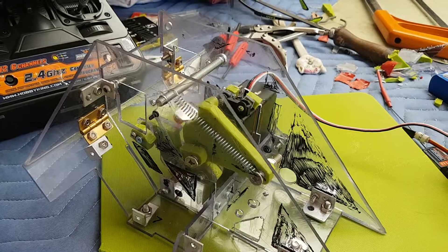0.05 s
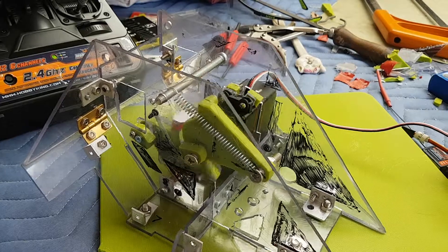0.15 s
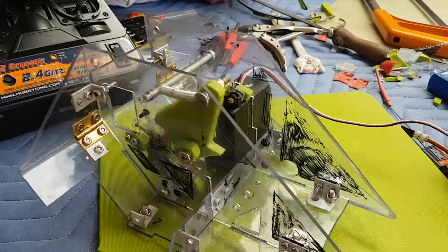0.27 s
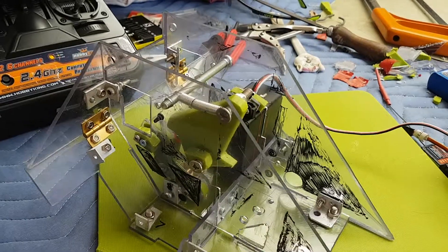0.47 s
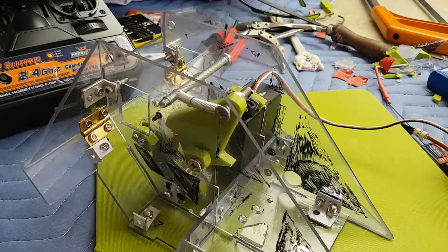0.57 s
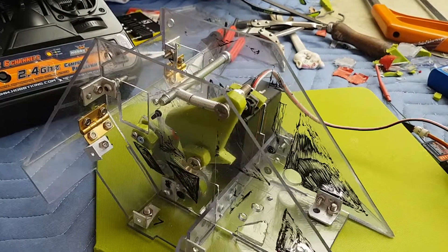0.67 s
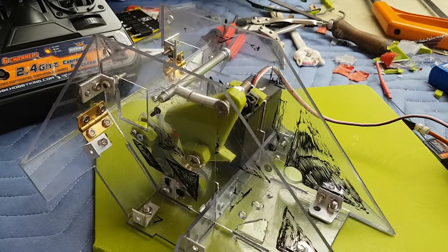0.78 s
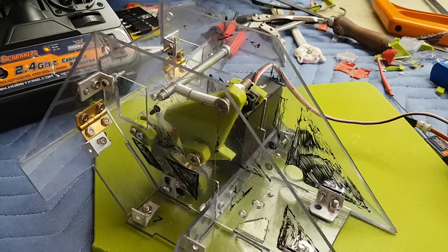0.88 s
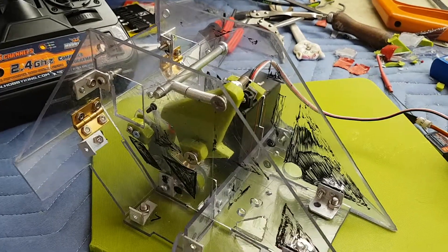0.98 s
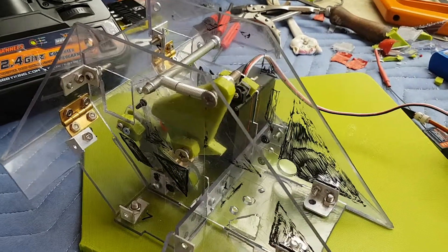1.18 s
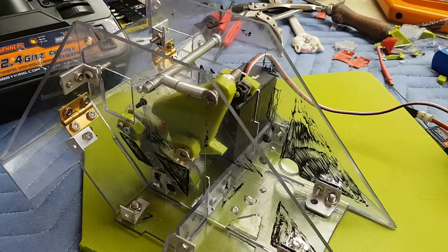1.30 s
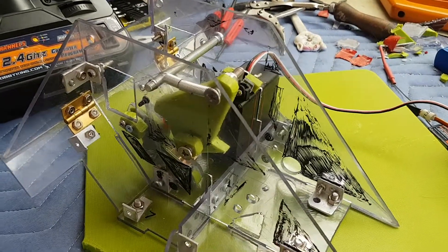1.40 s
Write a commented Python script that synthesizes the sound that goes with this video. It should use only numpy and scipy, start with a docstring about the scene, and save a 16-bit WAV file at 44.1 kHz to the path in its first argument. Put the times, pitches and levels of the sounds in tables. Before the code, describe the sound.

Sharp, loud snap of a plastic flipper after a short motor whine, then a light knock.

```python
"""A small geared motor winds the spring of a plastic flipper on a workbench, close to a stereo pair.
Its gears whine and grind, and the cam squeaks by stick and slip as it slides off. The arm snaps over in
a quick clatter that rings the plastic and overloads the microphones. The spring shivers, and the
mechanism knocks once more as it settles. A faint electric hum stays behind in the quiet room."""
import sys
import numpy as np
from scipy import signal
from scipy.fft import rfft, irfft
from scipy.io import wavfile

SR = 44100
rng = np.random.default_rng(int(sys.argv[2]) if len(sys.argv) > 2 else 0)


def file_out(sig):
    """Save sig as 16-bit WAV at sys.argv[1]."""
    # one column per channel
    cols = np.atleast_2d(sig).T
    # limit, then scale
    lim = np.clip(cols, -1, 1)
    pcm = np.round(lim * 32767).astype(np.int16)
    wavfile.write(sys.argv[1], SR, pcm)


N = 63945
T = np.arange(N) / SR
BIN_HZ = np.fft.rfftfreq(N, 1 / SR)


def amp(db):
    """Decibels to gain."""
    return 10 ** (np.asarray(db) / 20)


def unit(x):
    """Scales to rms 1."""
    return x / np.sqrt(np.mean(x ** 2) + 1e-20)


def read(points, hz):
    """Reads a table on a log-frequency axis."""
    f, value = np.transpose(points)
    return np.interp(np.log(hz + 1), np.log(f + 1), value)


def curve(rows):
    """Each column of a time table, at every sample."""
    times, *columns = np.transpose(rows)
    return [np.interp(T, times, column) for column in columns]


def pan(db):
    """Microphone gains that put the left one db above the right."""
    return amp(np.array([[.5], [-.5]]) * db)


def colour(x, spectrum):
    """Filters by a spectrum, to rms 1."""
    return unit(irfft(rfft(x) * amp(read(spectrum, BIN_HZ)), N))


def noise(shared):
    """White noise, with a share of its power common to both microphones."""
    shared = np.clip(shared, 0, 1)
    spectra = rfft(rng.standard_normal((3, N)))
    return irfft(np.sqrt(shared) * spectra[0] + np.sqrt(1 - shared) * spectra[1:], N)


def impulses(per_s):
    """Random clicks, separate at each microphone."""
    return rng.standard_normal((2, N)) * (rng.random((2, N)) < per_s / SR)


def wander(hz):
    """Random drift of rms 1, up to about this rate."""
    return unit(irfft(rfft(rng.standard_normal(N)) * np.exp(-(BIN_HZ / hz) ** 2), N))


def fall(start_s, decay_s):
    """Sudden start and exponential fall."""
    return (T >= start_s) * np.exp(-np.maximum(T - start_s, 0) / decay_s)


# How far the left microphone leads the right: frequency_hz, lead_rad
LEFT_LEAD = [(1500, 0.14), (1800, .6), (1950, 1.7), (2100, 1.9)]

def tone(phase, hz):
    """A sine of rms 1 as the two microphones hear it."""
    return np.sqrt(2) * np.sin(phase + np.array([[.5], [-.5]]) * read(LEFT_LEAD, hz))


# The motor's speed and effort, close up: time_s, pitch_hz, gain_db
MOTOR_RUN = [(0, 426, -3), (.02, 440, -0.5), (.06, 457.5, -1), (.076, 467.5, -2.5), (.092, 479.2, 0),
             (.135, 470.2, -1.5), (.16, 470.5, -2), (.178, 497, 3), (.205, 469.8, -1.5), (.226, 419.4, -9)]
# The whine's two lowest harmonics: time_s, first_db, second_db
WHINE_HARMONICS = [(0, -57, -47.5), (.025, -56.5, -45), (.06, -56.5, -38.5), (.073, -47.5, -55),
                   (.092, -42, -41.5), (.14, -50.5, -38.5), (.158, -43, -41), (.174, -53.5, -45.5),
                   (.183, -50, -58.5)]
# Gear mesh partials, mostly on the right: pitch_ratio, level_db, left_over_right_db
MESH_PARTIALS = [(2.98, -39.5, -5), (3.3, -40, -7), (3.93, -45.5, -4.5), (4.32, -43, -5.5),
                 (4.96, -52.5, 0)]
# Gear noise at the teeth: frequency_hz, relative_db
GEAR_SPECTRUM = [(30, -27), (100, -29.5), (250, -21), (450, -14), (700, -19.5), (1100, -10.5), (1400, -3),
                 (1900, -5.5), (2300, -13), (2800, -13.5), (6400, -16), (7800, -26), (11800, -27),
                 (13300, -35), (15500, -37)]
# Gear noise across the pair: frequency_hz, left_over_right_db
GEAR_PAN = [(500, -0.5), (1000, 2), (1500, -5.5), (2500, -1), (6000, -2.5), (7700, 5.5), (9700, -6),
            (11500, 3.5), (15000, 1)]
# Resonances of the housing: centre_hz, half_width_hz, lift_db
HOUSING_PEAKS = [(3210, 100, 5.5), (3980, 210, 9), (5010, 110, 11), (9900, 400, 10)]
MOTOR_STOP_S, MOTOR_COAST_S, SPEED_JITTER = .214, .014, .01
FLUTTER_DB, GEARS_DB, TEETH_PER_TURN, TOOTH_SPREAD_DB = 5, -34, 2, 7

def motor():
    """Wavering gear whine, with tooth clicks and grinding coloured by the housing."""
    hz, effort_db = curve(MOTOR_RUN)
    level = amp(effort_db) * np.exp(-np.maximum(T - MOTOR_STOP_S, 0) / MOTOR_COAST_S)
    turns = np.cumsum(hz * (1 + SPEED_JITTER * wander(hz=117))) / SR
    whine = sum(amp(db) * tone(2 * np.pi * k * turns, k * hz)
                for k, db in enumerate(curve(WHINE_HARMONICS), 1))
    for ratio, db, side_db in MESH_PARTIALS:
        gain = pan(side_db) * amp(db + FLUTTER_DB * wander(hz=35))
        whine += gain * tone(2 * np.pi * (ratio * turns + rng.random()), ratio * hz)
    contacts = np.diff(np.floor(turns * TEETH_PER_TURN), prepend=0)
    teeth = contacts * amp(TOOTH_SPREAD_DB * rng.standard_normal((2, N)))
    grind = .7 * noise(shared=.15)
    clicks = .5 * unit(teeth * rng.choice([-1, 1], (2, N)))
    gears = colour(grind + clicks, GEAR_SPECTRUM)
    housing_db = sum(lift / (1 + ((BIN_HZ - centre) / width) ** 2)
                     for centre, width, lift in HOUSING_PEAKS)
    housed = irfft(rfft(gears) * amp(housing_db) * pan(read(GEAR_PAN, BIN_HZ)), N)
    return level * (whine + amp(GEARS_DB) * housed)


# Room tone around the bench: frequency_hz, relative_db
AIR_SPECTRUM = [(25, -13), (60, -15.5), (100, -13.5), (140, -5), (250, -8.5), (400, -2.5), (650, -10.5),
                (1250, -13.5), (2100, -11.5), (2800, -19.5), (4300, -24), (10400, -33.5), (15500, -30.5)]
# The recorder's gain on that noise, below and above the split: time_s, low_gain_db, treble_gain_db
RECORDER_NOISE_GAIN = [(0, -66, -70.5), (.55, -70.5, -66.5), (.9, -70.5, -70), (1.08, -63.5, -66),
                       (1.25, -63, -66), (1.45, -60.5, -61)]
# Faint rustles in the room: centre_s, half_width_s, level_db
RUSTLE_SWELLS = [(.78, 0.028, -81), (1.159, 0.022, -73)]
# Their thin hiss: frequency_hz, relative_db
RUSTLE_SPECTRUM = [(2000, -23), (5000, -2), (7000, -2), (10000, -13), (15000, -22)]
AIR_WIDE_HZ, AIR_SPLIT_HZ = 805, 1800

def room_tone():
    """Steady room noise, held down by the recorder after the snap, comes back up; two faint rustles."""
    low_db, treble_db = curve(RECORDER_NOISE_GAIN)
    air = colour(noise(shared=.64 / (1 + (BIN_HZ / AIR_WIDE_HZ) ** 2)), AIR_SPECTRUM)
    low = signal.sosfiltfilt(signal.butter(2, AIR_SPLIT_HZ, fs=SR, output="sos"), air)
    swells = sum(amp(db) * np.exp(-((T - centre) / width) ** 2) for centre, width, db in RUSTLE_SWELLS)
    rustles = swells * colour(noise(shared=.23), RUSTLE_SPECTRUM)
    return amp(low_db) * low + amp(treble_db) * (air - low) + rustles


# The cam's squeak, towards the right microphone: time_s, pitch_hz, level_db
SQUEAK_GLIDE = [(.165, 2090, -38.5), (.178, 2060, -30), (.188, 1980, -29), (.196, 1870, -22),
                (.203, 1810, -16.5), (.210, 1633, -19), (.214, 1550, -19.5), (.22, 1520, -19.5),
                (.224, 1450, -38)]
# Its harmonics: harmonic_number, relative_db
SQUEAK_HARMONICS = [(1, -1.5), (2, -27.5), (3, -20), (4, -33), (5, -38.5)]
SQUEAK_JITTER = .011

def cam_squeak():
    """The cam sticks and slips; its pitch sinks as it nears the edge."""
    hz, db = curve(SQUEAK_GLIDE)
    phase = 2 * np.pi * np.cumsum(hz * (1 + SQUEAK_JITTER * wander(hz=600))) / SR
    slips = sum(amp(part_db) * tone(k * phase, k * hz) for k, part_db in SQUEAK_HARMONICS)
    uneven_db = .8 * wander(hz=250)
    sliding = (T > SQUEAK_GLIDE[0][0]) * (T < SQUEAK_GLIDE[-1][0])
    return pan(db=-9.5) * slips * amp(db + uneven_db) * sliding


STRIKE_RISE_S, PLASTIC_PAN_DB = .0014, -3

def panel_bark(hz, age_s):
    """The struck panel barks for a few cycles, a little to the right."""
    rise = age_s / STRIKE_RISE_S
    envelope = (rise * np.exp(1 - rise)) ** 2
    return pan(PLASTIC_PAN_DB) * envelope * tone(2 * np.pi * hz * age_s, hz) / np.sqrt(2)


def ring(modes, age_s):
    """Decaying modes of a struck body, a little different in phase at each microphone."""
    offsets = rng.random((len(modes), 1, 1)) + .11 * rng.standard_normal((len(modes), 2, 1))
    ringing = sum(amp(db - 60 * age_s / t60) * np.sin(2 * np.pi * (hz * age_s + offset))
                  for (hz, db, t60), offset in zip(modes, offsets))
    return ringing * (1 - np.exp(-2 * age_s / STRIKE_RISE_S))


# Blows of the arm, close up: start_s, panel_pitch_hz, ring_db, crack_db, thud_db
ARM_BLOWS = [(0.2274, 1378, -3.5, -27, -26.5), (.2300, 1490, -22.5, -7, -31.5),
             (0.2324, 1734, -3, -14.5, -22), (0.2364, 1539, 4, -7, -26.5), (0.2398, 1800, 0, -10, -26),
             (0.2472, 1720, -12.5, -17, -30), (0.2534, 1730, -7, -18.5, -30)]
# Modes of the plastic frame: pitch_hz, relative_db, t60_s
FRAME_MODES = [(478, -23, .13), (1112, -20, 0.11), (1266, -14, 0.11), (1405, -9, .09), (1474, -7, .07),
               (1558, -10, .06), (1782, -4, 0.066), (1860, -7, .045), (2140, -18, .05), (2410, -26, .1),
               (3005, -22, 0.13), (3690, -26, .08), (4322, -30, .09)]
# The crack of each blow: frequency_hz, relative_db
CRACK_SPECTRUM = [(300, -24.5), (1200, 4.5), (2500, 0.5), (4500, 4), (7000, -9.5), (10000, -8.5),
                  (15500, -9.5)]
# The thud on the bench: frequency_hz, relative_db
THUD_SPECTRUM = [(25, -14), (70, -8), (130, -10.5), (270, -2.5), (480, 0), (800, -7), (1200, -3),
                 (3000, -39)]
FRAME_DB, CRACK_DECAY_S, THUD_DECAY_S = -12, .0028, .0078

def arm_clatter():
    """Each blow of the arm cracks, thuds on the bench and rings the panel and frame."""
    crack = colour(noise(shared=.15), CRACK_SPECTRUM)
    thud = colour(noise(shared=.5), THUD_SPECTRUM)
    out = np.zeros((2, N))
    for start_s, hz, ring_db, crack_db, thud_db in ARM_BLOWS:
        age_s = np.maximum(T - start_s, 0)
        frame = amp(FRAME_DB) * pan(PLASTIC_PAN_DB) * ring(FRAME_MODES, age_s)
        out += amp(ring_db) * (panel_bark(hz, age_s) + frame)
        out += amp(crack_db) * crack * fall(start_s, CRACK_DECAY_S)
        out += amp(thud_db) * thud * fall(start_s, THUD_DECAY_S)
    return out


# The spring against the frame: frequency_hz, relative_db
SHIVER_SPECTRUM = [(200, -21), (480, -11.5), (800, -17), (1500, -2), (2200, -6), (4300, -16.5),
                   (7000, -30.5), (15000, -40.5)]
# Coil against coil, wide across the pair: frequency_hz, relative_db
COIL_SPECTRUM = [(2000, -25), (5000, -6), (7000, 0), (10000, -2), (15500, -5)]
RELEASE_S, SHIVER_DB, SHIVER_T60_S, COILS_DB, COILS_T60_S = .245, -31, .27, -41, .23
DECAYS_PER_T60 = np.log(1000)

def spring_shiver():
    """The slack spring shivers against the frame, its coils chatter, and it dies away."""
    shiver = colour(noise(shared=.5), SHIVER_SPECTRUM) * fall(RELEASE_S, SHIVER_T60_S / DECAYS_PER_T60)
    chatter = colour(impulses(per_s=4000), COIL_SPECTRUM) * fall(RELEASE_S, COILS_T60_S / DECAYS_PER_T60)
    return amp(SHIVER_DB) * shiver + amp(COILS_DB) * chatter


# Faint hum, towards the right microphone: harmonic_number, level_db, beat_depth, beat_period_s, dip_s
HUM_HARMONICS = [(2, -75.5, 0.26, .55, 0.856), (4, -76, .2, 0.77, 0.9), (5, -76, 0.41, 0.8, 0.59),
                 (6, -73, 0.76, 0.77, 0.94), (7, -74.5, 0.77, 0.3, 0.636), (8, -88, 1, .2, 0.596),
                 (9, -86, 0.49, 0.18, 0.494)]
HUM_HZ, HUM_START_S, HUM_RISE_S = 220.8, .3, .05
FADE_ABOVE_HZ, FADE_DB_PER_S, FADE_PIVOT_S = 1200, -13, .86

def electric_hum():
    """The idle drive hums; its harmonics beat slowly and the upper ones fade."""
    out = np.zeros(N)
    for k, db, depth, period_s, dip_s in HUM_HARMONICS:
        beat = 1 - depth * np.exp(2j * np.pi * (T - dip_s) / period_s)
        fade_db = FADE_DB_PER_S * (T - FADE_PIVOT_S) * (k * HUM_HZ > FADE_ABOVE_HZ)
        harmonic = np.exp(2j * np.pi * (k * HUM_HZ * T + rng.random()))
        out += amp(db + fade_db) * (beat * harmonic).real
    return pan(db=-7.5) * out * np.clip((T - HUM_START_S) / HUM_RISE_S, 0, 1)


# Modes of the base on the bench: pitch_hz, level_db, t60_s
BASE_MODES = [(76, -55, 0.12), (145.4, -48.5, 0.11), (266.5, -39.5, 0.098), (397, -37, 0.043),
              (512.6, -39.5, 0.1), (1294, -42, .05), (1600, -36.5, 0.087), (1840, -30.5, 0.035)]
# The duller crack as it lands: frequency_hz, relative_db
KNOCK_SPECTRUM = [(500, -27), (1600, -3), (2600, -1), (3600, -2), (4500, -2), (5300, -22), (6400, -12),
                  (9000, -20), (15500, -25)]
KNOCK_S = .4028

def settling_knock():
    """The mechanism drops back onto the padded bench and jolts the spring."""
    age_s = np.maximum(T - KNOCK_S, 0)
    bark = amp(-30) * panel_bark(hz=1584, age_s=age_s)
    crack = amp(-33) * colour(noise(shared=.058), KNOCK_SPECTRUM) * fall(KNOCK_S, decay_s=.0026)
    thud = amp(-35.5) * colour(noise(shared=.83), THUD_SPECTRUM) * fall(KNOCK_S, THUD_DECAY_S)
    rattle = amp(-39) * colour(noise(shared=.16), SHIVER_SPECTRUM) * fall(KNOCK_S, decay_s=.0098)
    return bark + ring(BASE_MODES, age_s) + crack + thud + rattle


# The room's decay, heard from the bench: frequency_hz, t60_s
ROOM_DECAY = [(50, .2), (150, .55), (400, .45), (1500, .26), (4000, .26), (8000, 0.16), (15000, 0.091)]
TAIL_DB, TAIL_DELAY_S, EARLY_DB, EARLY_DELAY_S, EARLY_T60_S = -21.5, .006, -15.5, .002, .08

def room_reflections(near):
    """Early bounces off the bench clutter, then a short tail that dies by band."""
    echoes = impulses(per_s=4000) * (T > TAIL_DELAY_S)
    hz, age_s, bands = signal.stft(echoes, SR, nperseg=256)
    decay = amp(-60 * age_s / read(ROOM_DECAY, hz)[:, None])
    tail = signal.istft(bands * decay, SR, nperseg=256)[1][:, :N]
    early = impulses(per_s=1500) * fall(EARLY_DELAY_S, EARLY_T60_S / DECAYS_PER_T60)
    response = (amp(TAIL_DB) * unit(tail) + amp(EARLY_DB) * unit(early)) / np.sqrt(N)
    return signal.fftconvolve(near, response, axes=1)[:, :N]


def scene():
    """The mechanism close to the microphones, with the quiet room behind it."""
    near = motor() + cam_squeak() + arm_clatter() + settling_knock() + spring_shiver()
    return near + room_reflections(near) + electric_hum() + room_tone()


BAND_LIMIT_HZ = 15900

def record(dry):
    """The snap overloads the microphones into soft clipping; then the highest treble is cut."""
    clipped = dry / (1 + dry ** 6) ** (1 / 6)
    lowpass = signal.firwin(511, BAND_LIMIT_HZ, window=("kaiser", 9), fs=SR)
    return signal.oaconvolve(clipped, lowpass[None], "same")


dry = scene()
out = record(dry)
file_out(out)
```